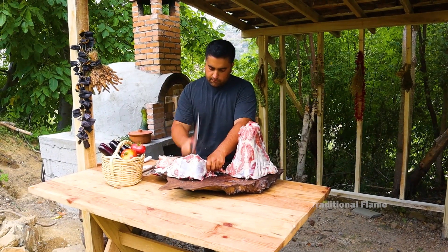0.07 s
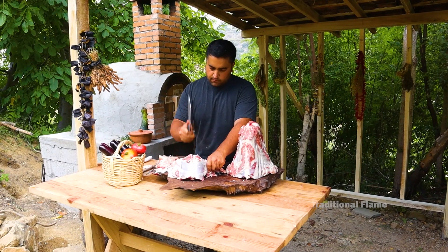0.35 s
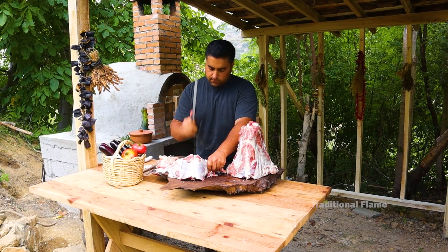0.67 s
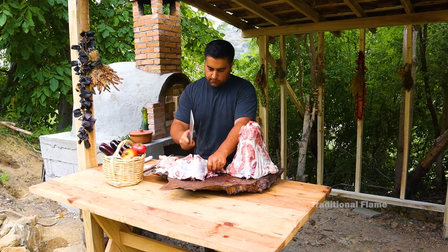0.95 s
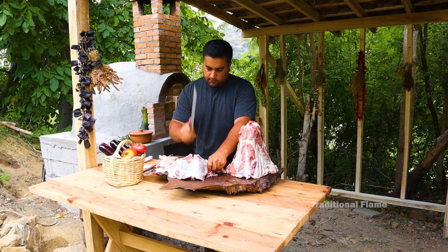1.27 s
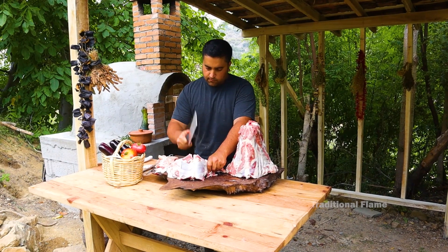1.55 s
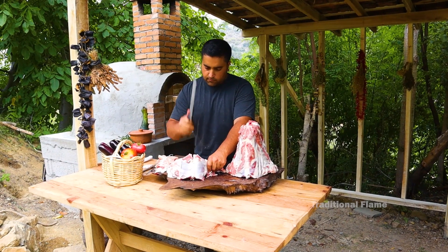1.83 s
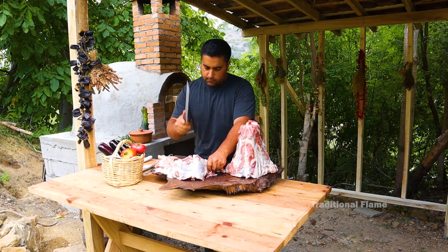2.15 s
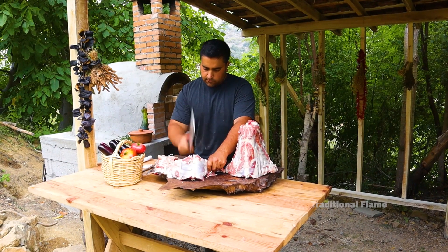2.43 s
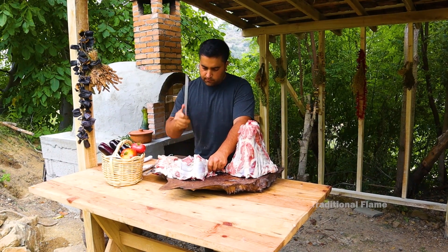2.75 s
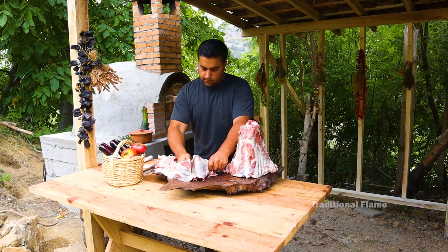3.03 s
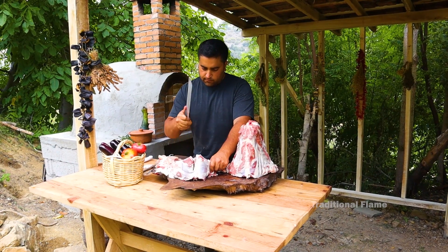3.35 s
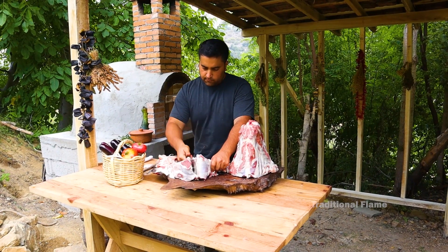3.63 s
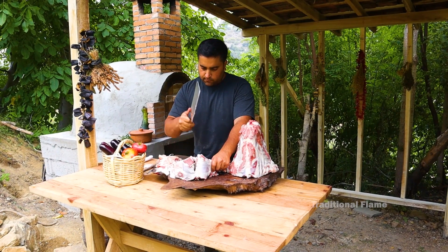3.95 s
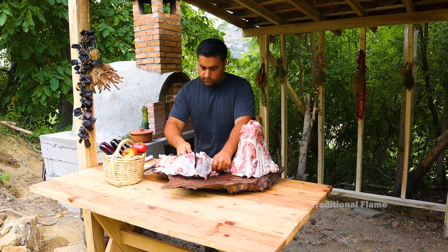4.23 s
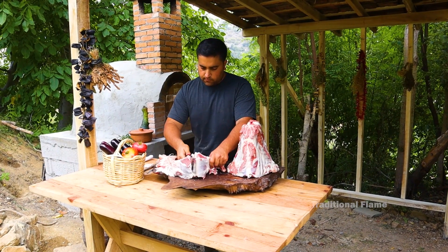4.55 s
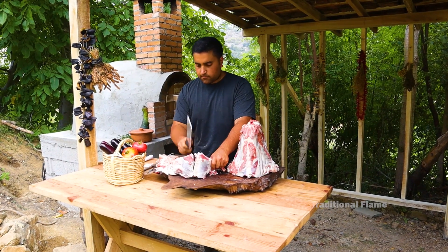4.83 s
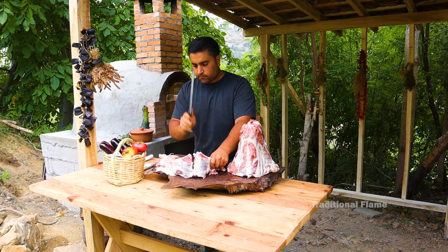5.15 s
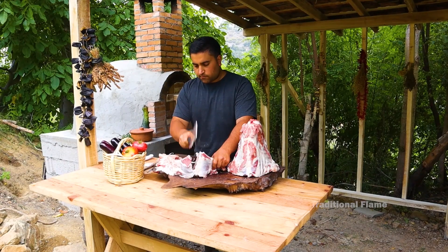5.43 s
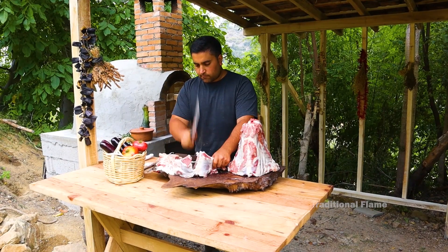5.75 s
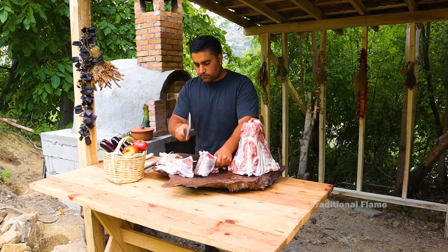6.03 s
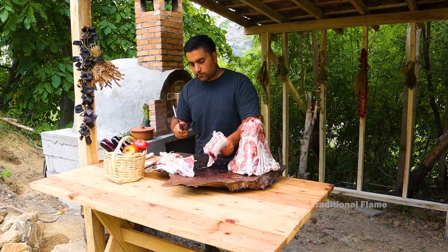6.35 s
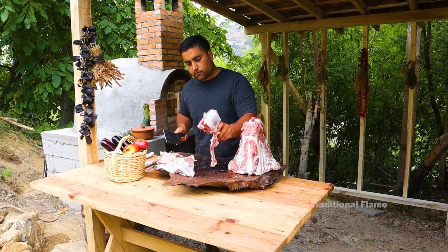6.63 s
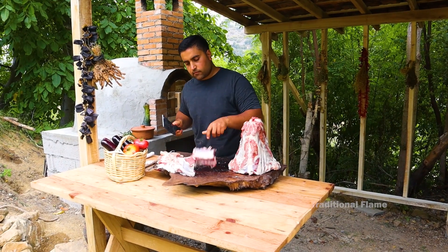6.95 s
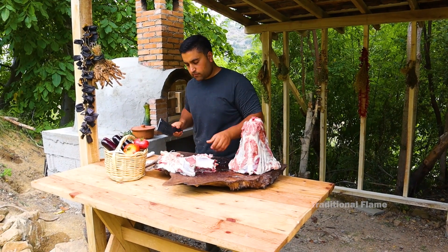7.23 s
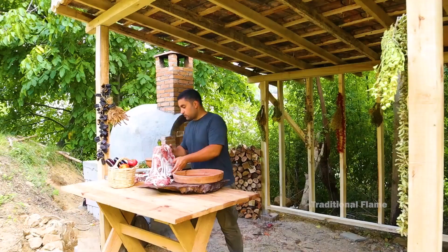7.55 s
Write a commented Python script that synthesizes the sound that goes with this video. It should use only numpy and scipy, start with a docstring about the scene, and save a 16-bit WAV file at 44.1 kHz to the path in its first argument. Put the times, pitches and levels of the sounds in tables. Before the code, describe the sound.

A faint, even outdoor hiss runs throughout, in an open shelter heard from in front of a table. From about 0.2 seconds a heavy cleaver chops through ribs on a thick wooden slab, with further blows at 0.9, 1.5, 2.0, 2.6, 3.1, 3.7 and 4.2 seconds. Each is a sharp, splintering crack of bone with a slight, damped steel ring and a low table thump. The slab then rebounds and clatters to rest in quick wooden knocks, with a very short echo. At 4.6 seconds a hand softly bumps the slab, and near 4.9 the blade slides out with a barely audible scrape. Two more chops land at 5.4 and 5.9 seconds, again rattling the slab. A faint wet tick comes at 6.3. At 7.1 a tossed piece of meat lands with a dull wet slap and a knock, followed by a tiny tick at 7.4.

```python
"""A faint outdoor hiss fills an open shelter. A heavy cleaver chops ten times through ribs on a thick
wooden slab: each blow fractures bone, excites the blade's modes and thumps the table beneath, and the
slab rebounds and clatters to rest while the roof answers briefly. After the eighth blow a hand bumps
the slab and the blade slides out of the cut. Two more blows follow, and at the end a piece of meat is
tossed down with a wet slap."""
import sys
import numpy as np
from scipy import signal
from scipy.fft import rfft, irfft
from scipy.io import wavfile
from scipy.ndimage import uniform_filter1d

SR = 44100
rng = np.random.default_rng(int(sys.argv[2]) if len(sys.argv) > 2 else 0)


def file_out(sig):
    """Save sig as 16-bit WAV at sys.argv[1]."""
    # one column per channel
    cols = np.atleast_2d(sig).T
    # limit, then scale
    lim = np.clip(cols, -1, 1)
    pcm = np.round(lim * 32767).astype(np.int16)
    wavfile.write(sys.argv[1], SR, pcm)


N = 343098
HIT = np.arange(SR // 2) / SR  # time axis of one impact, in seconds


def amp(db):
    """Decibels as an amplitude ratio."""
    return 10 ** (np.asarray(db) / 20)


def unit(x):
    """Normalisation to rms 1."""
    return x / np.sqrt(np.mean(x ** 2) + 1e-20)


def crest(x):
    """Normalisation of the loudest 5 ms to rms 1."""
    return x / np.sqrt(uniform_filter1d(x ** 2, size=220).max() + 1e-20)


def along(points, hz):
    """Interpolation of (Hz, value) points on a logarithmic frequency axis."""
    point_hz, values = np.transpose(points)
    return np.interp(np.log(hz + 1), np.log(point_hz + 1), values)


def add(track, start, x):
    """Superposition: x joins the track at start seconds."""
    part = track[max(round(start * SR), 0):][:len(x)]
    part += x[:len(part)]


def body(spectrum, size=4096):
    """Minimum phase: folding the cepstrum gives a causal impulse response with this spectrum."""
    cepstrum = irfft(np.log(amp(along(spectrum, np.fft.rfftfreq(size, 1 / SR)))))
    cepstrum[1:size // 2] *= 2
    cepstrum[size // 2 + 1:] = 0
    return irfft(np.exp(rfft(cepstrum)))


def through(force, response):
    """Convolution: a linear system's answer to a force."""
    return signal.fftconvolve(force, response)[:len(HIT)]


def tone(hz, t60, attack):
    """Damped oscillation: one resonance swells and dies."""
    return crest(np.sin(2 * np.pi * hz * HIT) * amp(-60 * HIT / t60) * (1 - np.exp(-HIT / attack)) ** 2)


def ring(modes, scatter_db):
    """Modal vibration: a sum of damped sines, struck at new strengths each time."""
    hz, db, t60 = np.transpose(modes)[:, :, None]
    level = db + scatter_db * rng.standard_normal(hz.shape)
    phase = 2 * np.pi * (hz * HIT + rng.random(hz.shape))
    partials = amp(level - 60 * HIT / t60) * np.sin(phase)
    return crest(partials.sum(axis=0) * (1 - np.exp(-HIT / .001)))


def crackle(length, fade, spiky_db):
    """Random excitation: tiny impulses of uneven size last for length seconds, then fade."""
    sizes = amp(spiky_db * unit(uniform_filter1d(rng.standard_normal(len(HIT)), size=24)))
    return sizes * rng.standard_normal(len(HIT)) * np.exp(-np.maximum(HIT - length, 0) / fade)


# The outdoor hiss. Each row: frequency in Hz, relative level in dB.
AIR_SPECTRUM = [(12, -28.5), (20, 9.5), (70, -2), (141, -5), (203, -4), (284, -6), (524, -7.5), (620, -8),
                (713, -8.5), (916, -10.5), (1180, -10), (1690, -13.5), (3700, -13.5), (5030, -18),
                (6290, -15), (15800, -24.5)]
# Its slow change in loudness. Each row: time in seconds, relative level in dB.
AIR_LEVELS = [(0.0, -57.5), (3.05, -60.5), (3.38, -59), (4.7, -59.5), (5.07, -57.5), (6.09, -58),
              (7.78, -56.5)]


def air():
    """Spectrally shaped noise: a faint, nearly even outdoor hiss."""
    colour = amp(along(AIR_SPECTRUM, np.fft.rfftfreq(N, 1 / SR)))
    hiss = irfft(rfft(rng.standard_normal(N)) * colour, N)
    level_db = np.interp(np.arange(N) / SR, *np.transpose(AIR_LEVELS))
    return unit(hiss) * amp(level_db + 3)


# Cracking bone and its splinters. Each row: frequency in Hz, relative level in dB.
CRACK_SPECTRUM = [(900, -21.5), (1800, 2.5), (3000, 0.5), (4200, 2), (5500, -6.5), (8000, -4), (16000, -42)]
SPLINTER_SPECTRUM = [(2500, -17), (5500, 5.5), (7500, -4), (9400, 1), (10200, -5), (11300, -2.5),
                     (13000, -8), (16000, -13)]


def slicing():
    """Shear: a short noise swells as the edge parts the meat."""
    tearing = crackle(.0083, .00047, spiky_db=6.5) * np.minimum(HIT / .0034, 1) ** 2
    return sum(crest(through(tearing, body(band))) for band in (CRACK_SPECTRUM, SPLINTER_SPECTRUM))


def fracture(spectrum, length, fade, spiky_db):
    """Brittle fracture: bone releases its stress in a burst of tiny breaks."""
    pressure = 1 - np.exp(-HIT / .00036)  # builds as the edge sinks in
    return crest(through(pressure * crackle(length, fade, spiky_db), body(spectrum)))


def rib(bite, hz):
    """Resonance: the breaking rib sounds briefly at its own pitch."""
    return crest(through(crackle(bite, .0016, spiky_db=1), tone(hz, t60=.022, attack=.0002)))


# The thick wooden slab. Each row: frequency in Hz, relative level in dB.
SLAB_SPECTRUM = [(100, -32), (220, -5), (350, -7.5), (430, -2.5), (560, 1.5), (690, 0), (810, 2.5),
                 (900, -4), (1010, -5.5), (1200, 0), (1500, -8.5), (2000, -17), (2600, -28.5), (4000, -47),
                 (8000, -77)]


def slab(bite, hz):
    """Forced vibration: the blow, cushioned by meat, drives the slab and one of its resonances."""
    push = crackle(bite, .0063, spiky_db=-1) * (1 - np.exp(-HIT / .01))
    resonance = tone(hz, t60=.0077, attack=.00026)
    return crest(through(push, body(SLAB_SPECTRUM))) + crest(through(push, resonance))


# The cleaver's modes. Each row: frequency in Hz, relative level in dB, 60 dB decay time in seconds.
BLADE_MODES = [(2445, -3.5, 0.4), (2630, 6, 0.26), (2976, 1.5, .11), (4100, 0.5, 0.33), (4220, 5, 0.14),
               (4320, -7.5, 0.21), (4330, -11, 0.14), (5560, 3.5, 0.11), (7400, -10.5, 0.6),
               (8800, -13, .1), (8870, -8, 0.075)]


def buried_blade(grip_db_per_s=90):
    """Added damping: the meat grips the ringing blade and hastens its decay."""
    return ring(BLADE_MODES, scatter_db=2.5) * amp(-grip_db_per_s * HIT)


# The shelter's reverberation. Each row: frequency in Hz, 60 dB decay time in seconds.
SHELTER_DECAY = [(80, 0.14), (300, 0.26), (800, 0.19), (1500, 0.09), (4000, 0.16), (8000, 0.15),
                 (15000, 0.091)]


def shelter(x, wet_db):
    """Diffuse reflection: roof and ground add a short tail, drawn afresh for each hit."""
    hz, t, bands = signal.stft(rng.standard_normal(len(HIT)), SR, nperseg=256)
    decay = amp(-60 * t / along(SHELTER_DECAY, hz)[:, None])
    tail = signal.istft(bands * decay, SR, nperseg=256)[1][:len(HIT)]
    tail *= 1 - np.exp(-HIT / .0036)
    return x + amp(wet_db) * through(x, tail / np.linalg.norm(tail))


# The blows. Each row: start in seconds, time in the bone in seconds, relative levels in dB of slicing,
# crack, splinters, wood and after-ring, rib pitch in Hz, rib level in dB, wood pitch in Hz, delay until
# the blade lands in seconds, relative levels in dB of thud and rebound, settling time in seconds.
BLOWS = [(0.224, .007, -45, -13.5, -10, -12, 0.5, 1412, -17.5, 483, 0.028, -16.5, -0.5, 0.26),
         (0.873, .009, -14.5, -14, -13.5, -7, -2.5, 4050, -19.5, 629, .016, -11, 2.5, .2),
         (1.462, .008, -41, -9, -13, -10, -3, 4082, -19, 547, .018, -8.5, 0, .22),
         (2.038, .0086, -21, -21.5, -22.5, -10.5, -5.5, 1912, -20, 505, .016, -6, -0.5, .2),
         (2.593, .012, -19, -14, -17.5, -8.5, -1.5, 1950, -21.5, 521, .023, -16, 1, 0.15),
         (3.141, 0.014, -31.5, -11.5, -14.5, -12.5, -0.5, 4216, -21, 581, .0325, -14.5, -14.5, .07),
         (3.673, .0072, -21, -10, -12, -16, -1.5, 2893, -10.5, 509, .022, -7, -2, .07),
         (4.199, 0.01, -16, -10.5, -29, -10, -6.5, 3021, -8, 508, 0.017, -7.5, -3.5, 0.2),
         (5.375, .007, -36.5, -8.5, -8, -11, -2, 2940, -17.5, 533.4, .022, -11.5, -1.5, .22),
         (5.9279, .0046, -40.5, -8.5, -16, -6, -21.5, 4080, -9.5, 1098, .01, -20, -9.5, .29)]


def chops():
    """Wedge action: the edge parts the meat and splits the bone, exciting blade and slab."""
    out = np.zeros(N)
    for start, bite, slice_db, crack_db, splinter_db, wood_db, ring_db, *resonances in BLOWS:
        rib_hz, rib_db, wood_hz = resonances[:3]
        add(out, start - .005, amp(slice_db - 3.5) * slicing())
        bone = amp(crack_db) * fracture(CRACK_SPECTRUM, bite, fade=.0045, spiky_db=2.5)
        bone += amp(rib_db) * rib(bite, rib_hz)
        bone += amp(splinter_db) * fracture(SPLINTER_SPECTRUM, bite * .75, fade=.005, spiky_db=6.5)
        wood = amp(wood_db - 4) * slab(bite, wood_hz)
        blade = amp(crack_db + ring_db - 15) * buried_blade()
        # Small splinters keep breaking as the bone is wedged apart.
        crunch = amp(crack_db + ring_db - 16) * fracture(SPLINTER_SPECTRUM, bite, fade=.018, spiky_db=6)
        reverberant = shelter(bone, wet_db=ring_db - 12) + shelter(wood, wet_db=ring_db / 2 - .5)
        add(out, start, reverberant + blade + crunch)
    return out


# The table's bass response. Each row: frequency in Hz, relative level in dB.
TABLE_SPECTRUM = [(30, -33), (55, -20), (80, 0.5), (115, -6), (160, -2), (195, 1.5), (225, 0.5), (270, 0),
                  (380, -3), (800, -42), (3000, -72.5)]
SWING_HZ, SWING_PEAK_S, SWING_WIDTH_S = 143, .011, .0048


def thud(db, rumble_db):
    """Flexure: the table top swings down and back once, then rumbles."""
    t = HIT - SWING_PEAK_S
    swing = np.cos(2 * np.pi * SWING_HZ * t) * np.exp(-(t / SWING_WIDTH_S) ** 2)
    rumble = crest(through(crackle(.0063, .042, spiky_db=2.5), body(TABLE_SPECTRUM)))
    return amp(db) * (amp(rumble_db) * rumble - swing)


# The hard edge of a knock. Each row: frequency in Hz, relative level in dB.
EDGE_SPECTRUM = [(800, -12.5), (1600, 2), (2700, 3.5), (3600, -2.5), (4500, -1.5), (5500, -9),
                 (8500, -12.5), (11000, -25), (16000, -41)]
# Slab and table modes. Each row: frequency in Hz, relative level in dB, 60 dB decay time in seconds.
WOOD_MODES = [(80, -13, .42), (110, -15, .25), (152, -10, .3), (198, -2, .36), (238, -5, .34),
              (409, -4, .28), (536, 1, .26), (618, -2, .22), (775, 2, .24), (825, 0, .18), (878, 0, .18),
              (968, -3, .18), (1151, -2, .17), (1240, -1, .16)]
CONTACT_HZ, HARD_FROM_DB, RISE_HZ_PER_DB = 816, -21.5, 38.5


def knock(db, edge_db, bass_db=-19):
    """Impact of wood on wood rings the table; a harder, shorter one sounds higher and jars the blade."""
    contact = .13 * crackle(.0052, .0056, spiky_db=4.5)
    contact[0] += 1  # the main impulse
    wood = crest(through(contact, body(SLAB_SPECTRUM)))
    wood += amp(bass_db - 11) * crest(through(contact, body(TABLE_SPECTRUM)))
    grit = amp(edge_db + 2) * crest(through(crackle(.0022, .0044, spiky_db=3.5), body(EDGE_SPECTRUM)))
    steel = amp(edge_db - 14) * ring(BLADE_MODES, scatter_db=3.5)
    pitch = CONTACT_HZ + RISE_HZ_PER_DB * max(edge_db - HARD_FROM_DB, 0)
    pitch *= np.exp(.041 * rng.standard_normal())
    clack = amp(-1.5) * tone(pitch, t60=.02, attack=.003)
    table = amp(-11) * ring(WOOD_MODES, scatter_db=1.5)
    return amp(db - 9.5) * (shelter(wood + grit, wet_db=-5) + clack + steel + table)


def chatter(start, settle, count=6, first_db=-17, fall_db=21.5, scatter_db=4):
    """Dissipation: times and levels of uneven contacts that weaken as the slab settles."""
    progress = (np.arange(count) + 1 + rng.uniform(-.3, .3, count)) / count
    levels = first_db - fall_db * progress + scatter_db * rng.standard_normal(count)
    return zip(start + settle * progress, levels)


# The uneven slab tips onto another corner.
# Each row: start in seconds, relative level in dB, relative level of the hard edge in dB.
CORNER_KNOCKS = [(0.33, -12, -27), (0.378, -18.5, -41), (0.423, -17, -35.5), (0.967, -9, -30.5),
                 (1.028, -12, -24), (1.063, -11, -40), (1.093, -20, -29), (1.559, -13.5, -50),
                 (1.58, -8.5, -36.5), (1.626, -14, -20), (1.649, -6, -48), (2.144, -15, -15.5),
                 (2.179, -3.5, -37), (2.207, -23, -9), (2.724, -7.5, -22.5), (3.281, -18, -20.5),
                 (3.306, -19, -40), (3.376, -27.5, -32), (3.881, -16, -20.5), (3.926, -16, -36),
                 (4.303, -11, -27), (4.351, -14.5, -22), (4.384, -20.5, -36), (4.421, -17.5, -22),
                 (4.562, -28.5, -15.5), (5.503, -11.5, -14), (5.516, -15, -28.5), (5.589, -17, -31.5),
                 (5.614, -15, -42), (5.688, -26.5, -30), (6.018, -11.5, -21), (6.045, -11, -36.5),
                 (6.09, -11, -25.5), (6.111, -10.5, -50), (6.156, -19.5, -30.5)]
PRESS_S, REBOUND_S, SECOND_SIDE_S = .004, .0645, .016  # delays of the slab's contacts


def rocking():
    """Inelastic rebound: driven onto the table, the slab jumps, lands on two sides, tips and settles."""
    out = np.zeros(N)
    for start, *_, land, thud_db, rebound_db, settle in BLOWS:
        add(out, start + land - SWING_PEAK_S, thud(thud_db, rumble_db=-5.5))
        add(out, start + land + PRESS_S, knock(thud_db + 6.5, edge_db=-18.5, bass_db=-14))
        fall_back = start + REBOUND_S
        add(out, fall_back, knock(rebound_db, edge_db=-24.5))
        add(out, fall_back + SECOND_SIDE_S, knock(rebound_db - 7.5, edge_db=-15.5))
        for when, db in chatter(fall_back, settle):
            add(out, when, knock(db, edge_db=-31))
    for start, db, edge_db in CORNER_KNOCKS:
        add(out, start, knock(db, edge_db))
    return out


# The hand, then the tossed piece, lands on the slab. Each row: start in seconds, relative level in dB.
SOFT_LOADS = [(4.561, -22.5), (7.133, -17.5)]


def bumps():
    """Cushioned impact: a soft load knocks the slab once and makes the table rumble."""
    out = np.zeros(N)
    for start, db in SOFT_LOADS:
        add(out, start, knock(db + 3, edge_db=-27, bass_db=-6.5))
        add(out, start, thud(db - 11.5, rumble_db=-2))
    return out


# The sliding blade. Each row: frequency in Hz, relative level in dB.
SCRAPE_SPECTRUM = [(2000, -27.5), (3700, 8), (5500, -6), (7800, 9.5), (9800, 4), (11000, 0.5), (12700, -6),
                   (16000, -14.5)]
# Its one stroke: start in seconds, length in seconds, peak level in dB.
SCRAPE_STROKE = (4.845, .11, -55)


def scrape():
    """Sliding friction: faint noise swells and fades as the blade leaves the cut."""
    out = np.zeros(N)
    start, length, db = SCRAPE_STROKE
    stroke = np.sin(np.pi * np.minimum(HIT / length, 1)) ** 2
    friction = stroke * rng.standard_normal(len(HIT))
    add(out, start, amp(db) * crest(through(friction, body(SCRAPE_SPECTRUM))))
    return out


# Wet meat. Each row: frequency in Hz, relative level in dB.
MEAT_SPECTRUM = [(200, -8.5), (1300, 5), (2500, -2.5), (4500, -5), (8500, -2), (11000, -7.5),
                 (16000, -20.5)]
# Slaps and ticks. Each row: start in seconds, level in dB, length in seconds, low-pass cutoff in Hz.
MEAT_SLAPS = [(6.331, -43.5, 0.003, 9900), (7.095, -41, 0.01, 7000), (7.119, -28, 0.0047, 7800),
              (7.138, -23.5, 0.0118, 1820), (7.432, -40.5, 0.00055, 9800)]


def slaps():
    """Low-pass filtered impacts: wet meat lands with a dull smack among faint, brighter ticks."""
    out = np.zeros(N)
    for start, db, length, cutoff_hz in MEAT_SLAPS:
        low_pass = signal.butter(2, cutoff_hz, fs=SR, output="sos")
        smack = through(crackle(length, .002, spiky_db=2.5), body(MEAT_SPECTRUM))
        filtered = crest(signal.sosfilt(low_pass, smack))
        add(out, start, amp(db) * shelter(filtered, wet_db=-9))
    return out


def scene():
    """Superposition: all sources sum to one channel in front of the table."""
    return (chops() + rocking() + bumps() + slaps() + scrape() + air())[None]


def record(dry, top_hz=15850):
    """Saturation and band limiting: peaks flatten, deep bass is lowered and the top treble is removed."""
    clipped = dry / (1 + np.abs(dry) ** 5) ** (1 / 5)
    hz = np.fft.rfftfreq(N, 1 / SR)
    low_cut = amp(along([(20, -8.5), (52, -9), (76, 0)], hz))
    return irfft(rfft(clipped) * low_cut * (hz < top_hz), N)


dry = scene()
out = record(dry)
file_out(out)
```